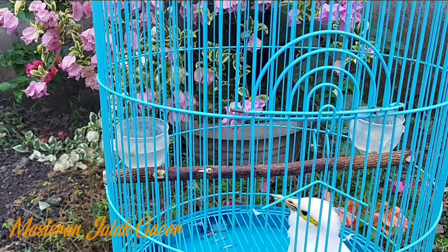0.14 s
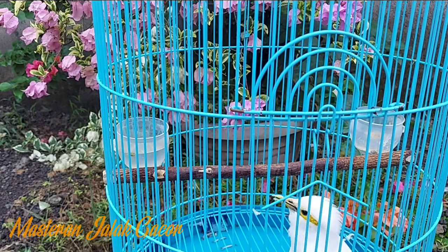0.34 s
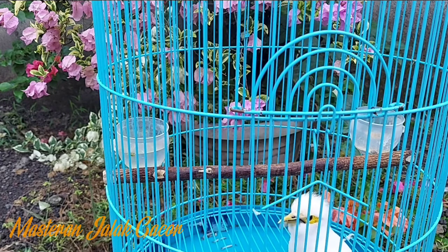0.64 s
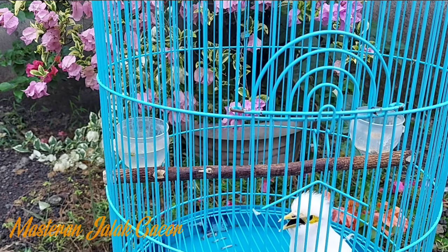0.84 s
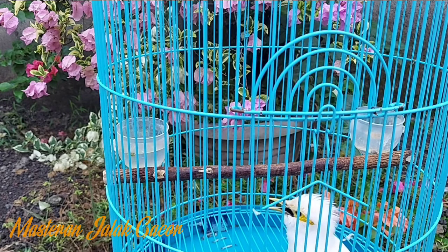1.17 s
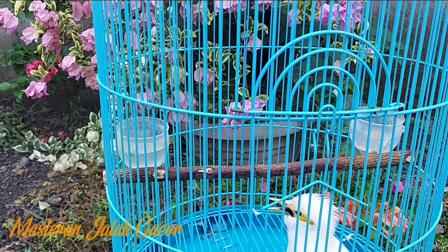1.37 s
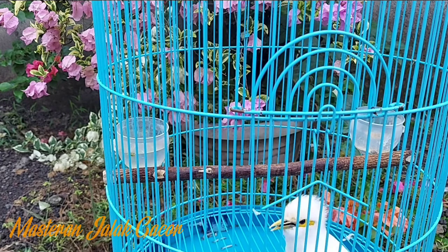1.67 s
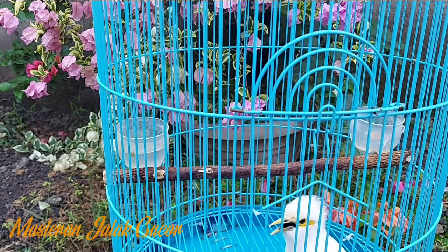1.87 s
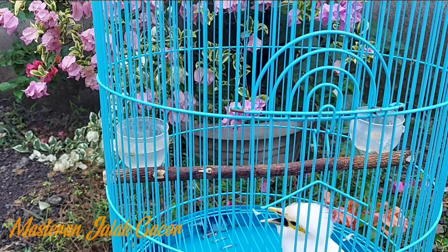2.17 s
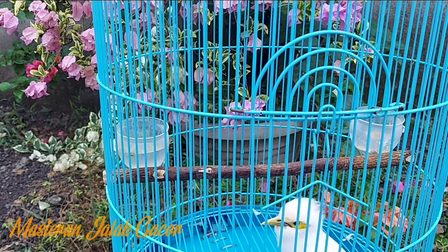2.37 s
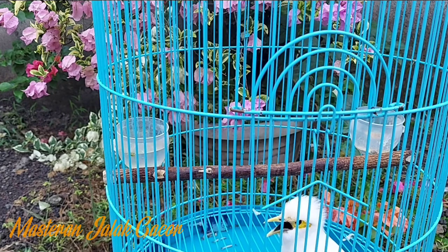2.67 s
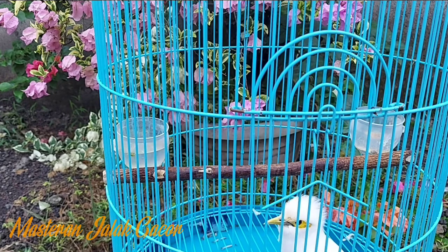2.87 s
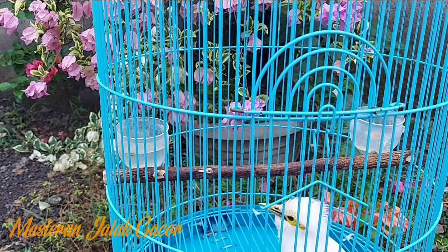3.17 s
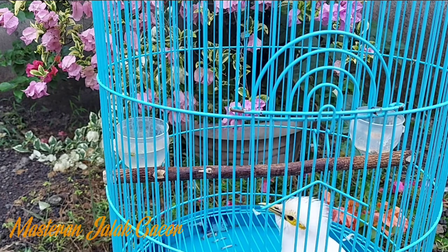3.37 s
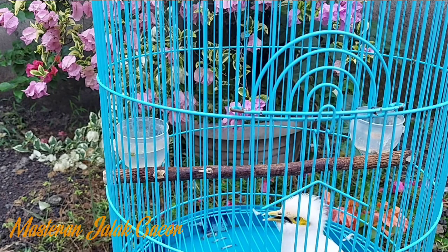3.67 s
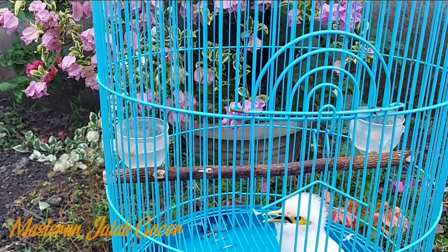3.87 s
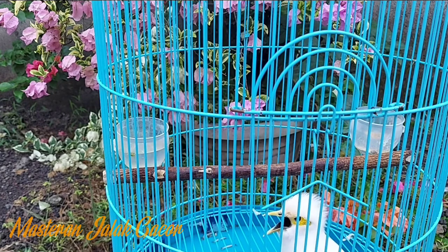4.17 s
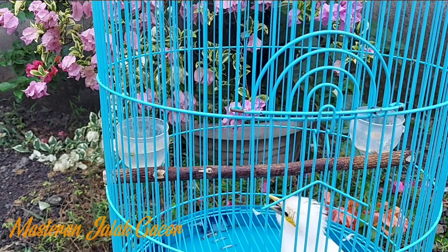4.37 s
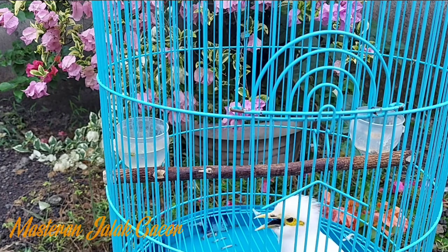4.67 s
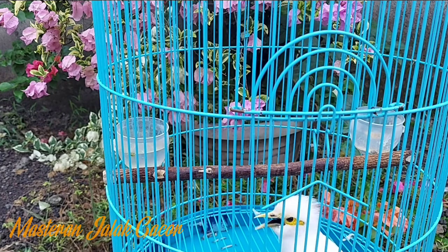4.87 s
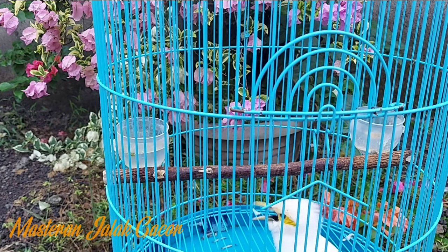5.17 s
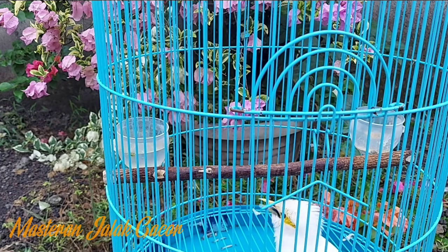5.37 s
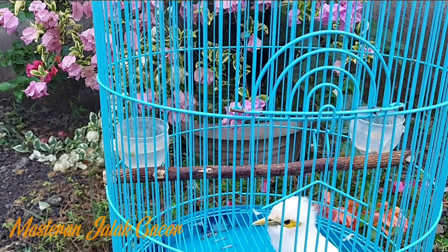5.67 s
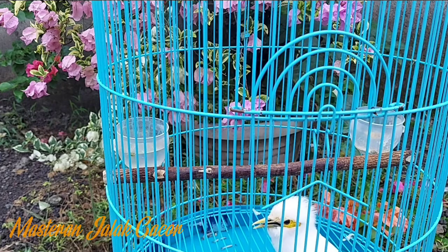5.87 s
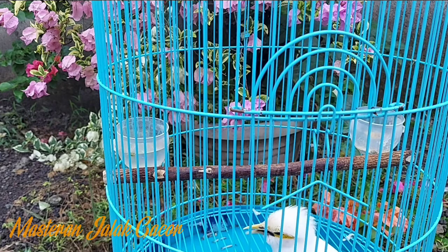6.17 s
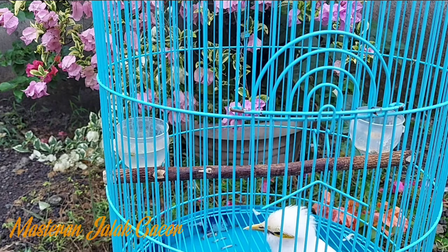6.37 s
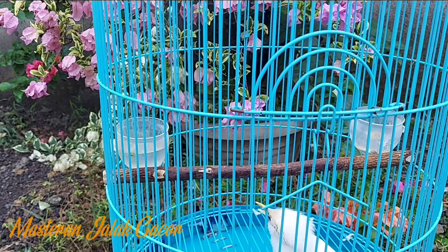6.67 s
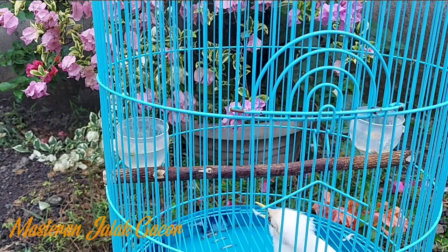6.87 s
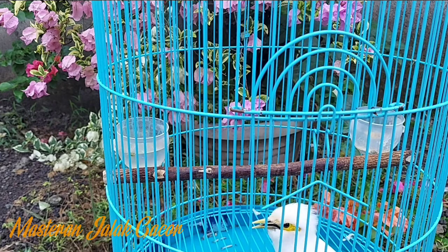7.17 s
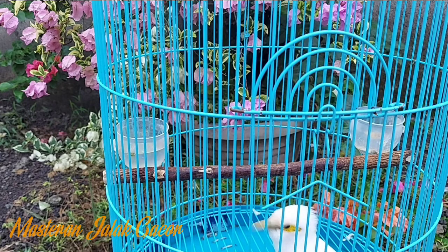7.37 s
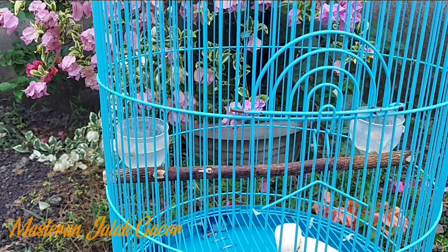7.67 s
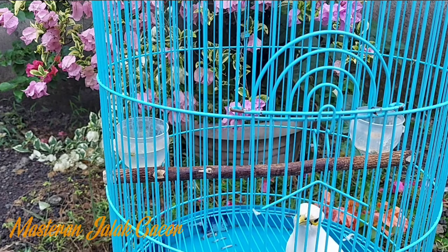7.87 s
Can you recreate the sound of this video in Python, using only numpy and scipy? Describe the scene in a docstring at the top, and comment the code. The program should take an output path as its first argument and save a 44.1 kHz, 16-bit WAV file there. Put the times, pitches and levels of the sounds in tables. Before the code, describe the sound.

In a garden, a starling in a wire cage sings nearby in short, busy bursts. Falling sweeps and swooping whistles come first, followed by twangy buzzes, fast ticking chatter, peeps and soft coos, broken by two growling rattles and three raspy notes. The song has a slight metallic ring and a light outdoor echo. Behind it are a second bird's distant pure whistles and a faint rumble with droning engines.

```python
"""In a garden, a caged starling sings close by: scooped whistles, falling sweeps, buzzing twangs,
fast chatter, soft coos, two dry rattles that sink into a growl, and hoarse rasps. Membranes in its
voice box (the syrinx) vibrate, pulse and flap; cage wires ring along and the garden echoes.
Another bird whistles farther off, and once a faint held tone lingers after the starling's peep,
like its late echo. Under it all lie a low outdoor rumble and two distant engines."""
import sys
import numpy as np
from scipy import signal
from scipy.fft import rfft, irfft, next_fast_len
from scipy.io import wavfile
from scipy.ndimage import uniform_filter1d

SR = 44100
rng = np.random.default_rng(int(sys.argv[2]) if len(sys.argv) > 2 else 0)


def int16_out(signal):
    """Quantize to a 16-bit WAV file."""
    q = np.round(np.clip(np.atleast_2d(signal).T, -1, 1) * 32767)
    wavfile.write(sys.argv[1], SR, q.astype(np.int16))


N = 354123
TIME = np.arange(N) / SR
CUTOFF_HZ = 15800

# A note's base is its lowest tone; its overtones are 2, 3, 4... times as high.
# when each twang is sung: start_s, base_db, overtones_db, pitch_ratio, length_ratio
TWANG_NOTES = [(1.612, -2.5, -0.5, 0.99, 1.05), (1.827, -0.5, 1, 1, 0.97), (4.429, -4, -5, .98, 1.02),
               (4.769, -1.5, -3, 0.99, 0.96), (4.976, -3, -2.5, 0.99, 1.116),
               (7.149, -2.5, -2, 0.99, 1.005)]
# when each rattle comes: start_s, length_s, level_db
RATTLE_TIMES = [(2.768, .155, 0), (6.083, 0.22, -.5)]
# when each rasp comes: start_s, level_db, length_ratio
RASP_TIMES = [(3.325, -15, 1.02), (3.509, -15.5, 1.01), (3.694, -15, 0.99)]


def from_db(db):
    """Turn decibels into a number to multiply a sound by."""
    return 10 ** (np.asarray(db) / 20)


def at_hz(points, hz):
    """Read a curve at a frequency, with the octaves evenly spaced."""
    known_hz, values = np.transpose(points)
    return np.interp(np.log(hz + 1), np.log(known_hz), values)


def noise(colour, size):
    """Noise of power 1; its colour says how strong each frequency is."""
    n = next_fast_len(size)
    gain = from_db(at_hz(colour, np.fft.rfftfreq(n, 1 / SR)))
    hiss = irfft(rfft(rng.standard_normal(n)) * gain, n)[:size]
    return hiss / np.sqrt(np.mean(hiss ** 2) + 1e-20)


def stereo_noise(colour, side, size=N):
    """Noise for two ears: the same in both at side=0, unrelated at side=1."""
    return (noise(colour, size) + side * noise(colour, size) * [[1], [-1]]) / np.sqrt(1 + side ** 2)


def wander(rate_hz, size):
    """A random curve that drifts roughly between -1 and 1."""
    at = np.arange(size) * rate_hz / SR
    count = int(at[-1]) + 2
    return 1.2 * np.interp(at, np.arange(count), rng.standard_normal(count))


def unfold(shape, stretch):
    """Turn a note's shape into a time axis and one smooth curve per column."""
    ms, *columns = np.transpose(shape)
    times = ms * stretch / 1000
    t = np.arange(int(times[-1] * SR)) / SR
    return [t] + [uniform_filter1d(np.interp(t, times, c), size=90, mode="nearest") for c in columns]


def add(out, start_s, sound):
    """Mix a sound in at its time, with softened ends."""
    index = np.arange(len(sound))
    fade = np.minimum(np.minimum(index, index[::-1]) / 20, 1)
    at = round(start_s * SR) + index
    inside = (at >= 0) & (at < N)
    out[at[inside]] += (sound * fade)[inside]


def phase_of(hz):
    """How far a vibration has turned, in radians."""
    return 2 * np.pi * np.cumsum(hz) / SR


def syrinx(shape, notes, jitter, air_db, fall_db, trill_hz=100, trill=0, flutter_db=0, top_hz=CUTOFF_HZ):
    """The voice box glides through a shape for each note; a trill can shake pitch and loudness."""
    # how the open beak passes the upper overtones: frequency_hz, gain_db
    beak = [(2000, -2.5), (2900, -6), (3800, -15), (5000, -6), (7200, 3.5), (9500, -5), (12000, -9),
            (14500, -10), (15800, -31.5)]
    # air hissing through a hard-driven syrinx: frequency_hz, level_db
    air = [(300, -20.5), (1500, -11.5), (3000, -7), (7000, 2.5), (10000, -6.5), (15500, -7)]
    out = np.zeros(N)
    for start_s, base_db, overtones_db, pitch_ratio, stretch in notes:
        t, hz, first_db, second_db, upper_db = unfold(shape, stretch)
        shake = np.cos(phase_of(trill_hz * (1 - np.exp(-t / .0115))))  # quickens up to trill_hz
        # the tighter the membranes, the less steady the pitch
        unsteady = jitter * np.maximum(hz / 3500, 1) ** 3 * wander(1800, len(t))
        hz = hz * pitch_ratio * (1 + trill * shake + unsteady)
        phase = phase_of(hz)
        note = from_db(first_db + base_db) * np.sin(phase)
        note += from_db(second_db + overtones_db) * np.sin(2 * phase)
        for k in range(3, 11):
            level_db = upper_db + overtones_db + at_hz(beak, k * hz) - fall_db * (k - 3)
            top_fade = np.clip((top_hz - k * hz) / 800, 0, 1)
            note += from_db(level_db) * top_fade * np.sin(k * phase)
        note += from_db(upper_db + overtones_db + air_db) * noise(air, len(t))
        add(out, start_s, note * from_db(flutter_db * shake))
    return out


def garden_rumble():
    """Low outdoor noise slowly swells and sinks."""
    # the rumble's colour: frequency_hz, level_db
    colour = [(20, -21), (55, 4), (100, 1.5), (250, -14.5), (420, -19), (950, -30.5), (2700, -19.5),
              (4500, -23), (7200, -27), (9500, -37), (14000, -35), (15800, -46)]
    # its loudness: time_s, level_db
    swell = [(0.0, -47), (0.22, -45.5), (0.69, -47.5), (1.01, -47), (1.65, -49), (1.9, -46.5),
             (2.42, -51.5), (4.72, -50.5), (5.01, -52), (6.17, -47), (7.56, -52), (8.03, -45)]
    return from_db(np.interp(TIME, *np.transpose(swell)) + .5) * stereo_noise(colour, side=.5)


def engines(waver=.031, flutter_db=2.5):
    """Two distant motors drone, their speed and loudness wavering."""
    # one list per motor: time_s, firing_hz, level_db
    motors = [
        [(0, 72.15, -55), (1.2, 70.93, -51), (1.55, 87.75, -53), (1.85, 88, -45), (2.2, 81.8, -54.5),
         (3, 66.03, -53.5), (7.6, 66.83, -52.5), (8.03, 72.5, -41)],
        [(0, 119.6, -68), (2, 119.6, -60.5), (4.2, 124.9, -57.5), (5.7, 118.8, -56.5), (7, 120.2, -51.5),
         (7.6, 129.7, -55.5), (8.03, 146, -45)],
    ]
    # tones in the drone: multiple_of_firing_rate, level_db
    tones = [(1, 3.5), (2, -13.5), (3, -15), (5, -24.5), (6, -24), (9, -33)]
    out = np.zeros(N)
    for motor in motors:
        times, firing_hz, db = np.transpose(motor)
        phase = phase_of(np.interp(TIME, times, firing_hz) * (1 + waver * wander(15, N)))
        for multiple, tone_db in tones:
            level_db = np.interp(TIME, times, db) + tone_db + flutter_db * wander(8.1, N)
            out += from_db(level_db) * np.sin(multiple * phase)
    return out


def scoops():
    """The syrinx whistles down and swoops back up."""
    # one scoop: time_ms, pitch_hz, base_db, second_tone_db, upper_tones_db
    shape = [(0, 5200, -43.5, -68.5, -65.5), (11.92, 3650, -23, -33, -43), (26.45, 3110, -12.5, -50.5, -63),
             (47, 3000, -12.5, -51, -48), (62.9, 3480, -8.5, -20, -32), (74.7, 4170, -15, -29.5, -28.5),
             (87.1, 5020, -12, -21, -24.5), (103.5, 6630, -29.5, -49.5, -44.5)]
    # when it is sung: start_s, base_db, overtones_db, pitch_ratio, length_ratio
    notes = [(-.068, -1, -2, 0.96, 0.96), (.930, 1, -0.5, 1, 0.98), (1.133, -2, -4, 0.98, 1.036),
             (1.364, -2.5, -6, 1, 1.06)]
    return syrinx(shape, notes, jitter=.007, air_db=-7, fall_db=6.5)


def sweeps(repeats=6, beat_s=.0746):
    """The syrinx slides steeply down, then repeats the slide on an even beat."""
    # one sweep: time_ms, pitch_hz, base_db, second_tone_db, upper_tones_db
    shape = [(0, 3800, -33, -46, -73), (5.77, 2780, -14.5, -47.5, -43), (15.18, 2320, -15.5, -36, -39),
             (25.5, 1980, -19, -48, -49), (44.3, 1425, -23.5, -43, -49.5), (50, 1170, -46.5, -52, -45)]
    # the softer, slower first note: start_s, base_db, overtones_db, pitch_ratio, length_ratio
    first = (.127, -2.5, -1.5, 1, 1.13)
    notes = [first] + [(.2078 + k * beat_s, .4, 0, 1, .94) for k in range(repeats)]
    return syrinx(shape, notes, jitter=.011, air_db=-11.5, fall_db=.8, top_hz=8330)


def far_whistles():
    """A pure, distant whistle arches up and settles on a lower held note."""
    # one whistle: time_ms, pitch_hz, level_db
    shape = [(0, 2620, -46), (20, 2630, -38), (58, 2690, -35), (112, 2845, -22), (147, 2760, -28.5),
             (180, 2420, -28), (225, 2210, -32), (385, 2220, -35), (415, 2180, -50)]
    # when it is heard: start_s, level_db, pitch_ratio, length_ratio
    # the one at 2.771 s lingers after the starling's peep like a late echo; the rest are another bird
    whistles = [(.165, -1, 1.05, .95), (2.771, -5, 1.1, 0.98), (4.437, -5, 0.99, 0.96),
                (5.73, -1.5, 1.007, 1), (7.41, -2, 1, 0.92), (7.848, -4.5, .925, 0.89)]
    out = np.zeros(N)
    for start_s, db, pitch_ratio, stretch in whistles:
        t, hz, swell_db = unfold(shape, stretch)
        phase = phase_of(hz * pitch_ratio * (1 + .005 * wander(148.4, len(t))))
        tone = np.sin(phase) + from_db(-35) * np.sin(2 * phase) + from_db(-40) * np.sin(3 * phase)
        add(out, start_s, from_db(db + swell_db) * tone)
    return out


def chip_string(tick_s, base_db, overtones_db, pitch_ratio, stretch, fade_db, length_s):
    """List the chips that follow a tick ever more slowly, each longer and thinner than the last."""
    notes, after, k = [], .039, 0
    while after * stretch < length_s:
        levels_db = (base_db + 1.25 - k * fade_db, overtones_db + 1.03 - k * .98)
        pitch = pitch_ratio * (1 if k else .96)
        notes.append((tick_s + after * stretch, *levels_db, pitch, 1.04 + k * .025))
        after += .0462 + k * .0024
        k += 1
    return notes


def chatter_notes():
    """List the low flicks, high flicks, ticks, peeps and chips that make up the chatter."""
    # a soft chip joined to a high flick: start_s, base_db, overtones_db, flick_lead_s
    squeaks = [(.762, -2, -8, 0.0011), (.796, -1.5, -2, .007)]
    # a flick, a tick, then chips:
    # tick_s, base_db, overtones_db, pitch_ratio, time_stretch, base_fade_per_chip_db, length_s
    runs = [(2.053, 0.5, 1.5, .99, 1.01, 2, .21), (4.099, -1.3, 1.2, 0.99, 1.007, 2.5, .21),
            (5.209, -1.3, -1, .995, .99, 2, .21), (6.766, 1, 1.15, 1.01, 1.033, 3, .27)]
    # a flick, a tick, then a held peep: tick_s, base_db, overtones_db, pitch_ratio, flick_kind
    calls = [(2.573, .3, 0, 0.98, "low"), (3.143, -0.8, -2.3, 1.013, "high"),
             (3.900, -0.5, 0.4, .995, "high"), (5.881, -0.5, 0.5, .99, "low"),
             (6.539, -0.5, -0.2, 1.007, "high")]
    flicks, ticks, peeps, chips = {"low": [], "high": []}, [], [], []
    # each note: start_s, base_db, overtones_db, pitch_ratio, length_ratio
    for start_s, base_db, overtones_db, lead_s in squeaks:
        chips.append((start_s, base_db - 8.5, overtones_db - 5, 1, .34))
        flicks["high"].append((start_s - lead_s, base_db, overtones_db, 1.064, 1.24))
    for tick_s, *voice, stretch, fade_db, length_s in runs:
        flicks["low"].append((tick_s - .038, *voice, .87))
        ticks.append((tick_s, *voice, .92))
        chips += chip_string(tick_s, *voice, stretch, fade_db, length_s)
    for tick_s, *voice, kind in calls:
        flicks[kind].append((tick_s - .034, *voice, .85))
        ticks.append((tick_s, *voice, 1))
        peeps.append((tick_s + .0348, *voice, .98))
    return flicks["low"], flicks["high"], ticks, peeps, chips


def chatter():
    """The syrinx fires off tiny bright notes: flicks and peeps rise, ticks and gritty chips fall."""
    # five note shapes: time_ms, pitch_hz, base_db, second_tone_db, upper_tones_db
    low_flick = [(0, 1300, -43, -29.5, -46), (8.3, 1560, -36, -20, -30.5), (12.7, 2260, -16.5, -32, -33.5),
                 (17.15, 2393, -14.5, -33, -25), (21.1, 2490, -8.5, -38.5, -46.5),
                 (25.8, 1900, -35, -45, -64.5)]
    high_flick = [(0, 1050, -58, -44.5, -46.5), (8.22, 1650, -34.5, -19, -38),
                  (12.85, 2200, -18, -26.5, -23.5), (18.9, 2860, -5.5, -34, -31.5),
                  (24.67, 2940, -7.5, -24.5, -30), (31.2, 2970, -18, -55.5, -58)]
    tick = [(0, 3400, -40, -39, -45.5), (4.93, 2730, -5, -32.5, -20), (9.4, 2570, -2.5, -27.5, -23),
            (13.52, 2440, -8.5, -36, -27.5), (19.2, 2280, -11, -34.5, -32.5),
            (23, 2030, -25.5, -61.5, -55.5)]
    peep = [(0, 1150, -44, -25, -44), (3.924, 1800, -33, -26.5, -35), (7.17, 2160, -8.5, -34.5, -43.5),
            (10.5, 2380, -4, -29, -26.5), (22.3, 2460, -11, -31, -25), (30.6, 2420, -13, -49, -34.5),
            (41.3, 2350, -21, -43, -46.5), (47.7, 2330, -42.5, -62, -67)]
    chip = [(0, 3400, -14.5, -42, -32), (3.64, 2880, -5, -34, -32), (7.37, 2210, -19.5, -23, -20),
            (11.05, 1880, -30.5, -16, -40.5), (17.2, 1670, -32.5, -15, -25), (24.2, 1600, -33, -18, -48),
            (32.7, 1490, -49, -32, -40.5)]
    low_flicks, high_flicks, ticks, peeps, chips = chatter_notes()
    tick_trill = dict(trill_hz=243, trill=.05, flutter_db=3.5)
    return (syrinx(low_flick, low_flicks, jitter=.0073, air_db=-10, fall_db=4.5)
            + syrinx(high_flick, high_flicks, jitter=.009, air_db=-2.5, fall_db=7.5)
            + syrinx(tick, ticks, jitter=.016, air_db=-8, fall_db=1.5, **tick_trill)
            + syrinx(peep, peeps, jitter=.0057, air_db=-13, fall_db=.5)
            + syrinx(chip, chips, jitter=.026, air_db=-8.5, fall_db=.6))


def twangs():
    """A fast trill in the syrinx makes a falling note buzz."""
    # one twang: time_ms, pitch_hz, base_db, second_tone_db, upper_tones_db
    shape = [(0, 5200, -37, -65, -75), (5.8, 4230, -17.5, -26.5, -47.5), (16.85, 4450, -13.5, -31, -39),
             (23.7, 3800, -15, -9.5, -14.5), (37.6, 3450, -18.5, -14.5, -24), (50.7, 3130, -16, -20, -26),
             (82.2, 2800, -31.5, -41, -48)]
    return syrinx(shape, TWANG_NOTES, jitter=.012, air_db=-21.5, fall_db=1.5,
                  trill_hz=110, trill=.085, flutter_db=-.3)


def puffs(lag_s=.04, width_s=.02):
    """A soft low thump comes with every twang and rasp."""
    # frequency_hz, level_db
    colour = [(20, -29), (60, 4.5), (115, 3.5), (250, -11.5), (600, -23.5), (1500, -37), (5000, -67)]
    bursts = [(start_s, overtones_db - 27) for start_s, _, overtones_db, _, _ in TWANG_NOTES]
    bursts += [(start_s, db - 13) for start_s, db, _ in RASP_TIMES]
    swell = sum(from_db(db) * np.exp(-((TIME - s - lag_s) / width_s) ** 2) for s, db in bursts)
    return swell * stereo_noise(colour, side=.99)


def coos():
    """The syrinx holds a soft, low note."""
    # one coo: time_ms, pitch_hz, base_db, second_tone_db, upper_tones_db
    shape = [(0, 490, -51, -60.5, -48), (13.8, 665, -40, -32.5, -37), (29.8, 720, -31, -23.5, -35),
             (51.7, 735, -31, -24.5, -33), (71, 730, -30.5, -25, -41), (90, 725, -37, -34.5, -48),
             (101, 715, -54, -53, -60)]
    # when it is sung: start_s, base_db, overtones_db, pitch_ratio, length_ratio
    notes = [(2.374, -1.4, 0.31, 1.018, 1), (4.582, -1.8, -2, 1, 0.92), (5.522, 0.43, 1, 1, 0.93),
             (5.679, 0.085, 0.94, 0.98, 0.93)]
    return syrinx(shape, notes, jitter=.0066, air_db=-24.5, fall_db=3.5)


def rattles(first_gap_s=.0218, gap_s=.0163, quickening=.019, pulse_fade_s=.015, air_fall_db_per_s=244):
    """Separate pulses of the syrinx speed up; hoarse air swells under them, then dies away."""
    # colour of pulses and air: frequency_hz, level_db
    colour = [(150, -63), (250, -32), (482, -20.5), (593, -34.5), (867, -32.5), (1100, -10.5),
              (1850, -27.5), (2280, -1.5), (3510, 0), (4320, -11.5), (5690, -20), (6770, -8), (8040, -20.5),
              (13700, -28), (15500, -35)]
    # strength of the pulses through a rattle: time_s, level_db
    force = [(0, -16.5), (.07, -20), (.135, -15), (.22, -21)]
    out = np.zeros(N)
    pulse_t, air_t = np.arange(SR // 30) / SR, np.arange(SR // 2) / SR
    snap_db = 6 - 60 * pulse_t / pulse_fade_s
    gaps = gap_s * (1 - quickening) ** np.arange(15)
    offsets = np.cumsum(np.r_[0, first_gap_s, gaps])
    for start_s, length_s, db in RATTLE_TIMES:
        for after_s in offsets[offsets < length_s + gap_s / 2]:
            force_db = db + np.interp(after_s, *np.transpose(force))
            add(out, start_s + after_s, from_db(force_db + snap_db) * noise(colour, len(pulse_t)))
        air_db = np.interp(air_t, [0, length_s], [-35, -27])
        air_db -= air_fall_db_per_s * np.maximum(air_t - length_s, 0)
        add(out, start_s, from_db(db + air_db) * noise(colour, len(air_t)))
    return out


def growls(pulse_hz=620, unevenness=.28, width_hz=650, lower_ratio=.67, lower_db=-9):
    """Fast uneven pulses ring two throat tones that sink as the beak closes."""
    # one growl: time_from_rattle_end_s, throat_hz, level_db
    shape = [(-.037, 2870, -27), (0, 2570, -19), (0.04, 1890, -25.5), (.074, 1140, -32.5), (.1, 750, -48.5)]
    after_s, throat_hz, swell_db = np.transpose(shape)
    out, ring_t = np.zeros(N), np.arange(SR // 200) / SR
    decay = np.exp(-np.pi * width_hz * ring_t)
    for start_s, length_s, db in RATTLE_TIMES:
        times = start_s + length_s + after_s
        gaps = np.exp(unevenness * rng.standard_normal(200)) / pulse_hz
        pulses = times[0] + np.cumsum(gaps)
        for at in pulses[pulses < times[-1]]:
            phase = 2 * np.pi * np.interp(at, times, throat_hz) * ring_t
            ring = np.sin(phase) + from_db(lower_db) * np.sin(lower_ratio * phase)
            pulse_db = db + np.interp(at, times, swell_db) + 13 + rng.normal(0, 1)
            add(out, at, from_db(pulse_db) * ring * decay)
    return out


def rasps(first_hz=160, last_hz=105, width_hz=800):
    """A flapping membrane slows down as it chops up a hoarse hiss and a rising ring in the throat."""
    # one rasp: time_ms, level_db, throat_hz
    shape = [(0, -18, 3600), (1.94, -3, 4500), (35.3, -1.5, 5100), (65.8, -3.5, 5200), (74.2, -9, 3500),
             (93, -29.5, 7000)]
    # its hiss: frequency_hz, level_db
    colour = [(300, -23.5), (550, -28), (750, -13), (1200, -16.5), (2500, -10), (4100, -11), (5000, -11),
              (5700, -9), (6650, 3), (7250, -6.5), (7900, -15.5), (9500, -17.5), (11500, -18),
              (15500, -21.5)]
    out = np.zeros(N)
    for start_s, db, stretch in RASP_TIMES:
        t, swell_db, throat_hz = unfold(shape, stretch)
        size = len(t)
        flap_hz = np.linspace(first_hz, last_hz, size) * (1 + .082 * wander(107, size))
        chop = 1 + np.linspace(.35, .65, size) * np.cos(phase_of(flap_hz))
        phase = phase_of(throat_hz)
        throat = wander(width_hz, size) * np.sin(phase) + wander(width_hz, size) * np.cos(phase)
        voice = from_db(-2) * noise(colour, size) + from_db(-5) * throat
        add(out, start_s, from_db(db + swell_db) * chop * voice)
    return out


def pip():
    """The syrinx ends with one faint rising note."""
    # the pip: time_ms, pitch_hz, base_db, second_tone_db, upper_tones_db
    shape = [(0, 3250, -56, -73, -80), (24.5, 3500, -44, -61.5, -73), (42.5, 4200, -29, -42, -62),
             (55.2, 4800, -36, -45, -66), (64, 4850, -57, -70, -80)]
    # when it is sung: start_s, base_db, overtones_db, pitch_ratio, length_ratio
    notes = [(7.828, -2.5, -3, 1, 1)]
    return syrinx(shape, notes, jitter=.0055, air_db=-7, fall_db=3.5)


def near_echoes(song):
    """The song plus echoes off tray and ground; each microphone port has its own colour and delay."""
    # how much louder the left port is: frequency_hz, left_minus_right_db
    balance = [(60, 3), (99, 0), (160, -3), (270, 2), (450, 0), (740, -1.5), (1220, 3.5), (2010, -1),
               (3330, 2), (5500, -3.5), (9080, 6), (15000, 10.5)]
    # how far ahead the left port is: frequency_hz, lead_radians
    lead = [(0, 0), (1210, 0.18), (1810, -0.5), (3270, 0.81), (4310, -1.5), (5170, 0.087), (6370, -0.2),
            (6890, -1.5), (9130, 1), (9730, -0.026), (11100, -0.4), (15700, -0.1)]
    # echoes off the cage tray and the ground: delay_ms, left_db, right_db
    echoes = [(.52, -36, -54.5), (.75, -31, -32.5), (4.1, -15, -25), (7.4, -16.5, -25)]
    size = next_fast_len(N)
    hz = np.fft.rfftfreq(size, 1 / SR)
    tilt = from_db(at_hz(balance, hz) / 2) * np.exp(.5j * at_hz(lead, hz))
    out = irfft(rfft(song, size) * np.array([tilt, 1 / tilt]), size)[:, :N]
    for delay_ms, left_db, right_db in echoes:
        delayed = np.interp(TIME - delay_ms / 1000, TIME, song, left=0)
        out += delayed * from_db([[left_db], [right_db]])
    return out


def cage_wires(song):
    """The song sets each wire ringing at its own pitch."""
    # the wires: pitch_hz, level_db, ring_s (time to fade by 60 dB)
    wires = [(3130, -20, .3), (5050, -15, .3), (5160, -13.5, .25), (5872, -18.5, 0.26), (6800, -15.5, 0.18),
             (9200, -8.5, .2), (11155, -13, 0.23)]
    out = np.zeros(N)
    for hz, db, ring_s in wires:
        decay = from_db(-60 / (ring_s * SR))
        gain = (1 - decay ** 2) / 2
        feedback = [1, -2 * decay * np.cos(2 * np.pi * hz / SR), decay ** 2]
        out += from_db(db) * signal.lfilter([gain, 0, -gain], feedback, song + 1e-18)
    return out


def scatter(sound, fade_s, delay_s, side):
    """Many tiny echoes from bars, plants and walls blur into a fading tail."""
    # the tail's colour: frequency_hz, level_db
    colour = [(100, -4), (1000, -2.5), (3000, -3), (5000, -0.5), (7500, -3), (11000, 2), (14500, 1),
              (16000, -18)]
    t = np.arange(int(fade_s * SR)) / SR
    envelope = from_db(-60 * t / fade_s) * np.clip(t / delay_s - 1, 0, 1)
    tail = envelope * stereo_noise(colour, side, len(t))
    tail /= np.sqrt(np.sum(tail ** 2) / 2)
    return signal.fftconvolve(sound[None], tail, axes=1)[:, :N]


def scene():
    """The starling in front, the far whistles mostly as echoes, the garden all round."""
    song = scoops() + sweeps() + chatter() + twangs() + coos() + rattles() + growls() + rasps() + pip()
    whistles = far_whistles()
    ringing = from_db(-4.5) * cage_wires(song)
    cage = from_db(-6.5) * scatter(song, fade_s=.048, delay_s=.0013, side=.8)
    yard = from_db(-19.5) * scatter(song, fade_s=.39, delay_s=.012, side=1)
    far = whistles * from_db([[-1], [-5]])
    far += from_db(2.5) * scatter(whistles, fade_s=.39, delay_s=.0089, side=1)
    return near_echoes(song) + ringing + cage + yard + far + puffs() + garden_rumble() + engines()


def record(dry):
    """The loudest peaks are rounded and the highest treble is cut steeply."""
    rounded = dry / (1 + (dry / .95) ** 6) ** (1 / 6)
    treble_cut = signal.ellip(10, .05, 60, CUTOFF_HZ, fs=SR, output="sos")
    return signal.sosfiltfilt(treble_cut, rounded)


dry = scene()
out = record(dry)
int16_out(out)
```